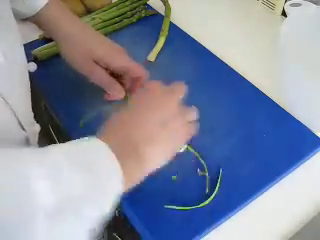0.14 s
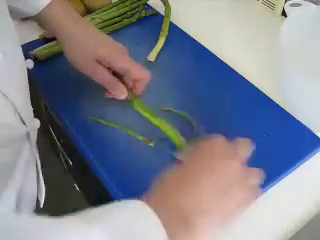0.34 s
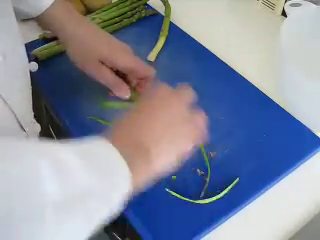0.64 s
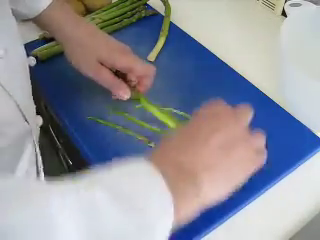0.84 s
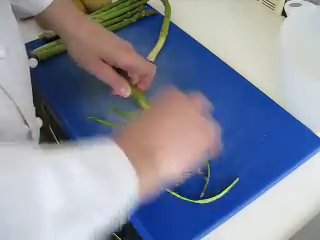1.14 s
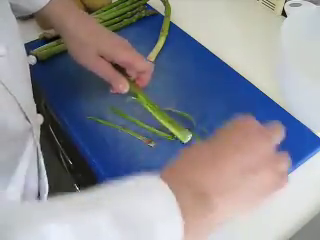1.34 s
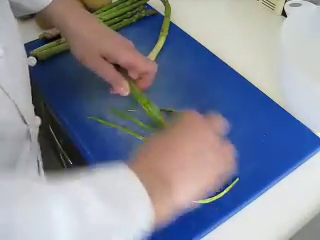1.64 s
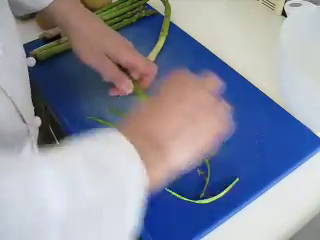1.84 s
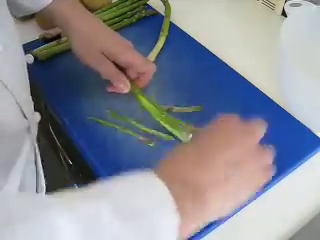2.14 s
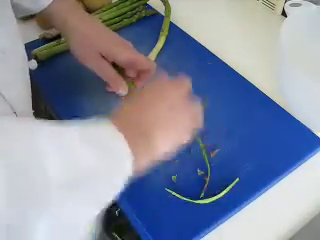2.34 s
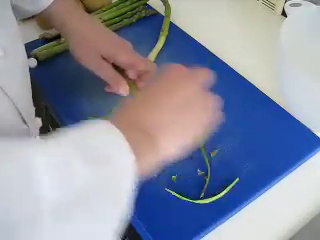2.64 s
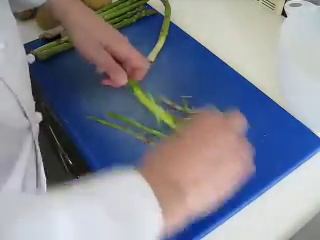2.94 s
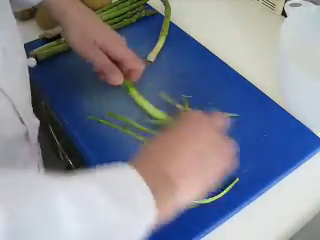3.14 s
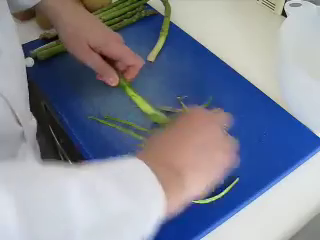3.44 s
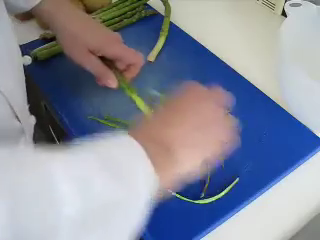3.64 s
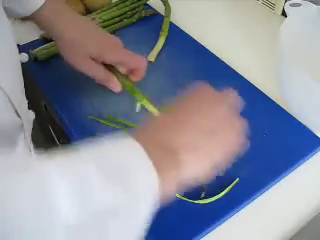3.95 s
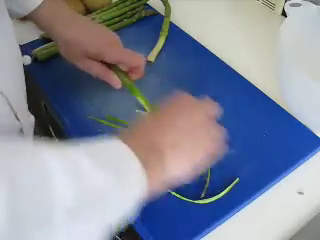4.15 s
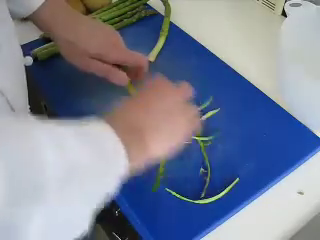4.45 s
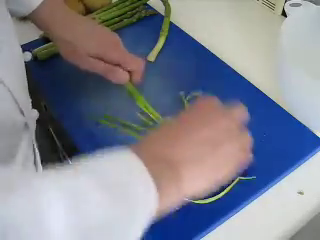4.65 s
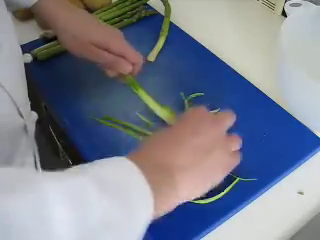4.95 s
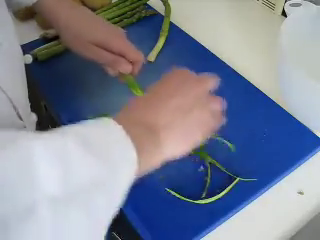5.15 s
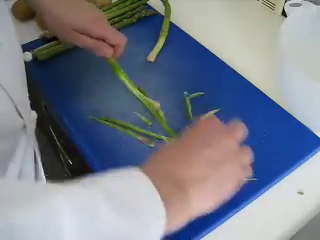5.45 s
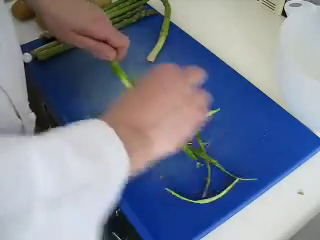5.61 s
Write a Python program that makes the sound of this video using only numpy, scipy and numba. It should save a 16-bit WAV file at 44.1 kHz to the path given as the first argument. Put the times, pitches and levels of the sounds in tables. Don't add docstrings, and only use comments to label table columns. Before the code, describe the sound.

Close, crisp peeling: bright metallic clicks, brief fibrous scrapes about two or three a second, occasional dull board knocks and faint appliance hum.

```python
import sys
import numpy as np
from scipy import signal
from scipy.io import wavfile
from scipy.ndimage import uniform_filter1d
from numba import njit

SR = 44100
rng = np.random.default_rng(int(sys.argv[2]) if len(sys.argv) > 2 else 0)


def dump(signal):
    limited = np.clip(np.atleast_2d(signal).T, -1, 1)
    pcm = np.round(limited * 32767).astype(np.int16)
    wavfile.write(sys.argv[1], SR, pcm)


def invert_db(level):
    return 10 ** (np.asarray(level, dtype=float) / 20)


N = 254871

# frequency in Hz, density in dB per Hz.
KITCHEN_AIR = [(15, -34), (25, -8), (217, -6.5), (796, -5), (962, -5.5), (1480, -5.5), (1650, -16),
               (4610, -12), (6050, -43), (7920, -16), (9070, -29), (14800, -17), (16000, -32)]
AIR_DB = -47
# centre in seconds, peak in dB, length in seconds.
DEEP_SWELLS = [
    (0.1, -59, 0.5),
    (1.2, -64, .3),
    (2.4, -63, 0.53),
    (3.3, -54.5, 0.63),
    (4.0, -62, .2),
    (5.05, -60, 0.25),
    (5.45, -55, .2),
]
FAN_SWELLS = [
    (0.06, -47, 0.17),
    (0.82, -51.5, 0.18),
    (1.65, -56.5, 0.51),
    (2.05, -58, 0.23),
    (3.05, -58, 0.18),
]
DEEP_REST_DB, DEEP_WANDER_DB = -64.5, 4.5
FAN_REST_DB, FAN_WANDER_DB = -66, 2.5

# bite in seconds, deepest cut in seconds,
# end in seconds, tearing in dB, blade hiss in dB.
STROKES = [(-0.15, -0.07, 0.052, -33.5, -33), (0.278, 0.381, 0.45, -31, -35.5),
           (0.732, 0.815, 0.88, -29, -34.5), (1.2, 1.274, 1.35, -32.5, -34.5),
           (1.644, 1.727, 1.82, -32, -36), (2.024, 2.14, 2.19, -30.5, -34.5),
           (2.467, 2.491, 2.56, -25.5, -30.5), (2.852, 2.888, 3.05, -30.5, -35),
           (3.185, 3.207, 3.227, -31, -36.5), (3.479, 3.499, 3.61, -30, -35.5),
           (3.83, 3.954, 3.96, -37.5, -42), (4.194, 4.244, 4.39, -35.5, -36.5),
           (4.525, 4.601, 4.64, -32, -34.5), (4.912, 4.99, 5.04, -30.5, -33.5),
           (5.31, 5.364, 5.39, -31.5, -37)]
# handle buzz in dB relative to the hiss, # board rumble in dB
# relative to the tearing, change of all four layers' level halfway out in dB.
GRIPS = [(3, 13.5, -2), (1.5, 1.5, -0.5), (-1, -3, -3.5), (-2.5, 0.5, 1), (1, -1, -8), (1, -3, 7),
         (0, -1, 2), (-4.5, -2, -7), (-2.5, 5, 9.5), (-2.5, -1.5, 1.5), (-1, 2, -3), (-7, -2, -2),
         (-4, 3.5, 6.5), (0.5, 7.5, -3.5), (-3, 1, 6.5)]
# frequency in Hz, width in Hz, level in dB.
STALK_RESONANCES = [(2550, 750, -6), (3234, 350, 2), (3720, 490, 0.5), (4410, 100, 0)]
BLADE_RESONANCES = [(5250, 58, 11), (5420, 310, 6.5), (5910, 340, 8.5), (7495, 98, 7.5), (8730, 320, 2),
                    (9740, 760, 1), (11700, 380, 3.5), (12040, 1140, 0.5), (13600, 470, 1),
                    (15200, 580, -2)]
# dB at landing, just before the bite, bite, deepest, halfway out, end.
TEAR_COURSE = (-44, -22, -10, 1, -10, -17.5)
HISS_COURSE = (-6, -3, 1, 1.5, -1.5, -8)
BUZZ_COURSE = (-44, -28, -8.5, -8, -13, -21)
RUMBLE_COURSE = (-50, -40, -23.5, -15.5, -18.5, -24)
SETTLE_S, BITE_S = .004, .006

# start in seconds, peak in dB, pitch in Hz, decay by 60 dB in seconds.
KNOCKS = [
    (0.009, -36, 620, 0.033),
    (1.048, -22, 594, 0.059),
    (1.895, -23, 626, 0.12),
    (4.359, -31.5, 599, 0.11),
    (5.192, -28, 650, 0.084),
    (5.362, -32, 630, 0.086),
]
# time in seconds, peak in dB.
JOLTS = [
    (0.672, -33.5),
    (2.403, -36.5),
    (3.788, -34),
    (4.113, -25),
    (4.465, -33.5),
    (4.844, -27.5),
    (5.265, -29.5),
    (5.755, -30.5),
]

# frequency in Hz, level in dB, decay by 60 dB in seconds.
YOKE = [(4330, 0, .022), (4050, -5, .01)]
BLADE_LOW = [(5230, 0, .04), (5340, -4, .02), (5480, -6, .012)]
BLADE_MID = [(6060, 0, .022), (5930, -2, .018), (5780, -5, .012), (6250, -5, .012), (7500, -14, .015)]
BLADE_TOP = [(8700, -9, .022), (9400, -8, .006), (11100, -4, .016), (11600, -2, .008), (12080, 0, .022),
             (12500, -1, .008), (13850, -2, .018), (14500, -5, .006), (15400, -4, .008)]
HANDLE = [(1536, 2.5, 0.012), (2570, 4, 0.0069), (3196, 5, 0.017), (4030, 3.5, 0.01)]
LANDINGS = [(0.2049, -2, -15.5, -6.5, -20), (0.6752, -1, -12.5, -12, -41), (1.074, -1.5, -20.5, -18, -15.5),
            (1.1472, -6.5, -26, -21, -13), (1.5913, -1, -13.5, -16.5, -13), (1.9923, -9.5, -13.5, -6, -14),
            (2.406, -0.5, -14, -16, -23), (2.7794, -3, -11, -9.5, -28), (3.1327, -12, -17, -13, -8),
            (3.1408, -11.5, -10, -8, -9), (3.4631, -7.5, -15.5, -15.5, -5.5), (3.7903, -4.5, -16, -7, -20),
            (4.114, -0.5, -15.5, -15.5, -21.5), (4.4665, -2.5, -17.5, -14, -21),
            (4.8473, -1.5, -11, -28, -12.5), (5.2657, -0.5, -14, -22, -22),
            (5.7586, -3.5, -15, -13.5, -12.5)]
LIFTS = [(0.453, -20.5, -2, -5, -15), (0.9443, -11, -21, -8, -15), (1.1415, -8.5, -14, -11, -9.5),
         (1.3367, -11, -5.5, -6.5, -10), (1.8348, -13.5, -29, 0.5, -11), (2.171, -6, -11, -19, -12),
         (2.1863, -2, -14, -5.5, -9.5), (2.5925, -11, 0, -5, -13), (2.6213, -12, 2, -11, -12),
         (2.9251, -4, -23, -27, -18), (2.9408, -11, 4, -6, -5), (3.2685, -8.5, -10, -16, -18),
         (3.5833, -7, -16, -3, -11), (3.966, -19.5, -25, -20, -19), (4.3217, -9.5, -22, -7.5, -6),
         (4.6959, -19.5, -12, -3.5, -11), (5.0848, -8.5, -20, -6, -11), (5.22, -13, -10, -15, -23),
         (5.2251, -15.5, -3, -23, -25), (5.3942, -3, -9, -19, -11)]
# time in seconds, top modes in dB, handle crack in dB relative to these.
SNAGS = [(0.3537, -14.5, -18), (0.491, -26, -15), (0.7302, -30, -18), (0.929, -22, -7), (1.0788, -17, -4),
         (1.3116, -26.5, 13), (1.706, -16.5, -5.5), (2.0158, -15.5, -6), (2.0367, -14.5, -8),
         (2.1184, -24, -4), (2.159, -21, -13), (2.3523, -19, -12), (2.56, -16, -5), (2.9124, -11, -19),
         (2.9167, -15.5, -3), (3.1931, -32, -3), (3.2426, -10.5, -8.5), (3.419, -33, -1), (3.512, -23, -8),
         (3.5693, -12, -14), (3.85, -22, -10), (3.91, -35, -4), (3.9302, -27, -4), (3.95, -23.5, 0),
         (4.0, -32, -10), (4.0187, -32, -6), (5.2038, -25, -5), (5.3303, -21, -10)]
LANDING_YOKE_DB, LIFT_LOW_DB = -16, -13.5
SNAG_YOKE_DB, SNAG_LOW_DB, SNAG_MID_DB = -12, -9, -12.5

# time in seconds, scrape in dB, singing pair in dB relative to it.
DISH_SLIDES = [
    [(2.938, -58, -9), (2.944, -18, -19), (2.962, -51, 7.5), (3.024, -33, -8), (3.12, -50.5, -4)],
    [(5.398, -45, 7), (5.404, -20, -9), (5.42, -33, 3), (5.428, -26.5, 4.5), (5.56, -51, 9.5)],
]
# frequency in Hz, width in Hz, level in dB.
DISH_RESONANCES = [(385, 140, -12.5), (650, 200, -8.5), (814, 77, -5.5), (973, 69, 5.5), (1051, 59, -3),
                   (1190, 100, -5.5), (1520, 240, -14.5), (1760, 130, -5), (1830, 34, -6.5),
                   (1980, 220, -8), (2820, 670, -15.5), (3320, 1600, -16)]

ROOM_T60_S, ROOM_TOP_T60_S = 0.55, 0.49
ROOM_DB, DISH_ROOM_DB = -9.5, -7.5


def level(x, db):
    return x * invert_db(db) / np.sqrt(np.mean(x ** 2))


def band(x, hz, width):
    return signal.lfilter(*signal.iirpeak(hz, hz / width, SR), x)


def above(x, hz):
    return signal.sosfilt(signal.butter(3, hz, "high", fs=SR, output="sos"), x)


def walk(rate):
    hold = int(SR / rate)
    steps = np.repeat(rng.standard_normal(N // hold + 1), hold)
    return 1.09 * uniform_filter1d(steps, hold)[:N]


def add(out, s, x):
    i = int(s * SR)
    out[i:i + len(x)] += x[:len(out) - i]


def ring(modes, push, mix_db=0):
    t = np.arange(SR // 8) / SR
    hz, db, t60 = np.transpose(modes)[:, :, None]
    decays = invert_db(db + mix_db) * np.sin(2 * np.pi * hz * t) * 1000. ** (-t / t60)
    y = signal.fftconvolve(np.sum(decays, axis=0), push)[:len(t)]
    return y / np.abs(y).max()


def swells(rows, rest_db, wander_db):
    s, db, length = np.transpose(rows)[:, :, None]
    rises = invert_db(db) * np.exp(-(2 * (np.arange(N) / SR - s) / length) ** 2)
    return (invert_db(rest_db) + rises.sum(axis=0)) * invert_db(wander_db * walk(5.2))


def kitchen():
    hz, db = np.transpose(KITCHEN_AIR)
    swell = walk(2.15)
    air = 0
    for f in 30 * 2 ** np.arange(0, 9.2, .5):
        band_db = np.interp(np.log(f), np.log(hz), db) + 2.0 * swell + 0.32 * walk(3.5)
        air = air + invert_db(band_db) * band(rng.standard_normal(N), f, f / 3)
    deep_hum = level(band(rng.standard_normal(N), 64, 26), -1.3)
    deep = swells(DEEP_SWELLS, DEEP_REST_DB, DEEP_WANDER_DB) * deep_hum
    fan_tone = np.sin(2 * np.pi * np.cumsum(204 + 3.0 * walk(6)) / SR)
    fan = swells(FAN_SWELLS, FAN_REST_DB, FAN_WANDER_DB) * fan_tone
    return level(air, AIR_DB) + deep + fan


def strokes(grain_db=3.0, patchy_db=2.65):
    t = np.arange(N) / SR
    snap_db = grain_db * np.minimum(rng.exponential(size=N // 40 + 1), 4)
    snaps = invert_db(np.repeat(snap_db, 40)[:N])

    def grains(share=1):
        return rng.standard_normal(N) * snaps ** share

    clump = patchy_db * walk(150)
    tear, hiss = 0, 0
    for hz, width, db in STALK_RESONANCES:
        tear = tear + invert_db(db + clump + 2 * walk(90)) * band(band(grains(), hz, width), hz, 2 * width)
    for hz, width, db in BLADE_RESONANCES:
        wander_db = 0.68 * clump + 0.5 * walk(45) + 2.5 * walk(11)
        hiss = hiss + invert_db(db + wander_db) * band(grains(0.44), hz, width)
    buzz = invert_db(0.32 * clump) * band(band(grains(), 1474, 190), 1100, 410)
    rumble = invert_db(2.0 * walk(50)) * band(band(grains(0.18), 650, 150), 395, 740)
    layers = np.array([level(tear, 1), level(hiss, 0.52), level(buzz, -0.17), level(rumble, 0.086)])

    gains = np.zeros((4, N))
    landed = np.transpose(LANDINGS)[0] + SETTLE_S
    for (bite, deepest, end, tear_db, hiss_db), (buzz_db, rumble_db, ease_db) in zip(STROKES, GRIPS):
        start = max(landed[landed < bite], default=-1)
        s = [start, bite - BITE_S, bite, deepest, (deepest + end) / 2, end]
        edge = np.clip(np.minimum(t - start, end + 0.008 - t) / 0.004, 0, 1)
        ease = [0, 0, 0, 0, ease_db, 0]
        courses = ((tear_db, TEAR_COURSE), (hiss_db, HISS_COURSE),
                   (hiss_db + buzz_db, BUZZ_COURSE), (tear_db + rumble_db, RUMBLE_COURSE))
        gains += edge * invert_db([db + np.interp(t, s, np.add(course, ease)) for db, course in courses])
    return np.sum(layers * gains, axis=0)


def knocks():
    out = np.zeros(N)
    for (s, db, hz, t60), chance in zip(KNOCKS, rng.standard_normal((len(KNOCKS), 900))):
        modes = [(hz, 0, t60), (0.63 * hz, -12, .7 * t60),
                 (0.812 * hz, -4, 0.45 * t60), (1.17 * hz, -4, 0.65 * t60)]
        push = np.hanning(900) * chance * np.exp(-np.arange(900) / 600)
        add(out, s - .004, invert_db(db) * above(ring(modes, push), 320))
    for s, db in JOLTS:
        add(out, s + 0.0028, invert_db(db + 4) * np.hanning(90))
    return out


def contacts():
    landings = [(s, db, crack, LANDING_YOKE_DB, low, mid) for s, db, crack, low, mid in LANDINGS]
    lifts = [(s, db, crack, yoke, LIFT_LOW_DB, mid) for s, db, yoke, mid, crack in LIFTS]
    snags = [(s, db, crack, SNAG_YOKE_DB, SNAG_LOW_DB, SNAG_MID_DB) for s, db, crack in SNAGS]
    return landings + lifts + snags


def clinks(chatter_s=.0025, tail_s=.0012, mix_db=2.5):
    out, t = np.zeros(N), np.arange(512) / SR
    touches = contacts()
    chances = rng.standard_normal((len(touches), 4, 512))
    for (s, db, crack_db, yoke_db, low_db, mid_db), chance in zip(touches, chances):
        over = np.maximum(t - chatter_s * np.clip(1.15 + db / 30, .3, 1), 0)
        push = np.minimum(t / .001, 1) * np.exp(-over / tail_s) * chance[0] * invert_db(2.5 * chance[1])
        crack = np.minimum(t / 0.00035, 1) * np.exp(-over / 0.00014) * chance[2]
        grip = [1 + .006 * chance[3, 20], 1, np.clip(.8 + .25 * chance[3, 21], .4, 1.2)]
        families = ((BLADE_LOW, low_db + 3.0), (BLADE_MID, mid_db + 4.5),
                    (BLADE_TOP, -1.5), (YOKE, yoke_db - 4.5))
        steel = 0
        for modes, family_db in families:
            strike_db = mix_db * chance[3, :len(modes), None]
            steel = steel + invert_db(family_db) * ring(np.multiply(modes, grip), push, strike_db)
        clink = above(steel, 3200) + invert_db(crack_db - 5) * ring(HANDLE, push)
        clink[:512] += invert_db(-5.5) * above(push, 7820)
        clink[:512] += invert_db(crack_db + 0.5) * band(band(crack, 2420, 3800), 2420, 3800)
        add(out, s - .0005, invert_db(db) * above(clink, 196))
    return out


def dish():
    t, out = np.arange(N) / SR, 0
    parts = []
    for hz, width, db in DISH_RESONANCES:
        stutter = invert_db(db + 3.6 * walk(70))
        parts.append(stutter * band(band(rng.standard_normal(N), hz, width), hz, 2 * width))
    singing = parts[3] + parts[4]
    pair, scrape = level(singing, -0.39), level(sum(parts) - singing, -0.13)
    scuff = 0
    for hz, width, db in BLADE_RESONANCES:
        scuff = scuff + invert_db(db + 2.0 * walk(48)) * band(rng.standard_normal(N), hz, width / 2)
    scrape += level(scuff, -0.94)
    for slide in DISH_SLIDES:
        s, db, pair_db = np.transpose(slide)
        edge = np.clip(np.minimum(t - s[0], s[-1] - t) / 0.0014, 0, 1)
        out = out + edge * (invert_db(np.interp(t, s, db)) * scrape + invert_db(np.interp(t, s, db + pair_db)) * pair)
    return out


def room(x):
    t = np.arange(SR) / SR
    noise = rng.standard_normal(SR)
    low = signal.lfilter(*signal.butter(2, 7000, fs=SR), noise)
    echoes = low * 1000. ** (-t / ROOM_T60_S) + (noise - low) * 1000. ** (-t / ROOM_TOP_T60_S)
    echoes *= np.clip((t - .003) / 0.0024, 0, 1)
    return signal.fftconvolve(x, echoes / np.sqrt(np.sum(echoes ** 2)))[:N]


def scene():
    near, far = clinks() + strokes() + knocks(), dish()
    earlier = np.pad(ring(BLADE_LOW + BLADE_MID + BLADE_TOP, rng.standard_normal(size=150)), (0, N))
    add(near, 0, invert_db(-21.5) * room(earlier)[1200:])
    echoes = room(invert_db(ROOM_DB) * near + invert_db(DISH_ROOM_DB) * far)
    return (near + far + echoes + kitchen())[None]


@njit
def follow(x, attack, release):
    y, e = np.empty(len(x)), 0.
    for i in range(len(x)):
        e += (abs(x[i]) - e) * (attack if abs(x[i]) > e else release)
        y[i] = e
    return y


def top_cut(x):
    return signal.sosfilt(signal.butter(12, 16980, fs=SR, output="sos"), x)


def record(dry, knee_db=-27, slope=0.23):
    x = signal.lfilter(*signal.iirnotch(7950, 9, SR), dry[0])
    envelope = follow(x, 1 / (0.0067 * SR), 1 / (0.099 * SR))
    gain = np.maximum(envelope / invert_db(knee_db), 1) ** -slope
    x = signal.sosfilt(signal.ellip(7, .3, 36, 15800, fs=SR, output="sos"), x * gain)
    return top_cut(x[None])


dry = scene()
out = record(dry)
dump(out)
```